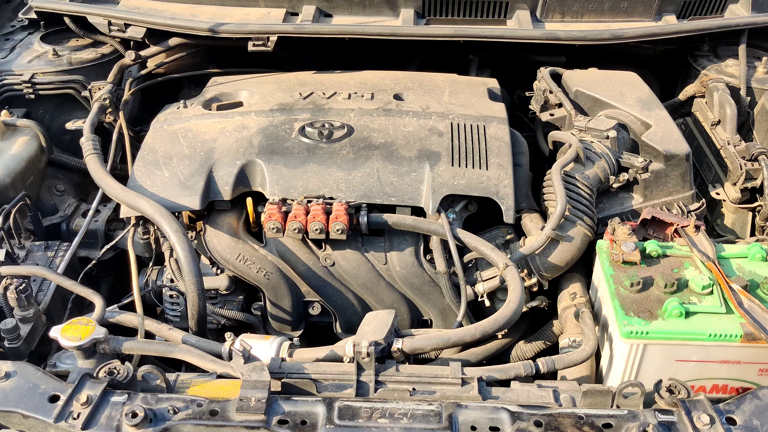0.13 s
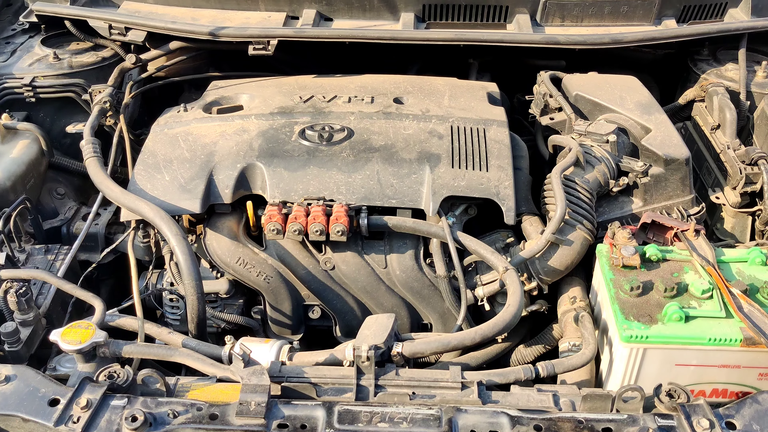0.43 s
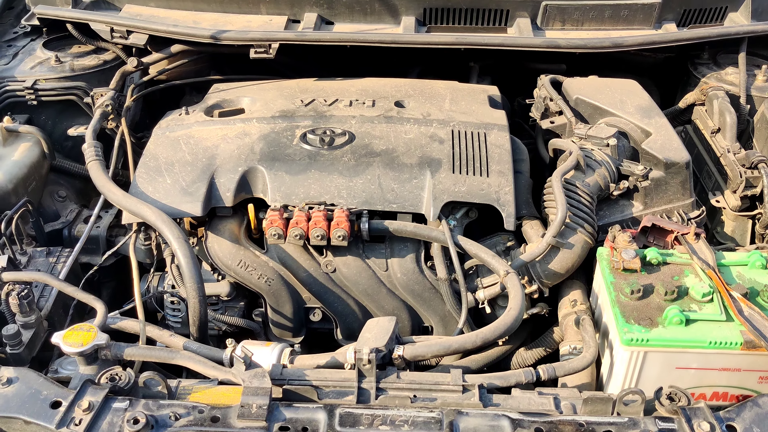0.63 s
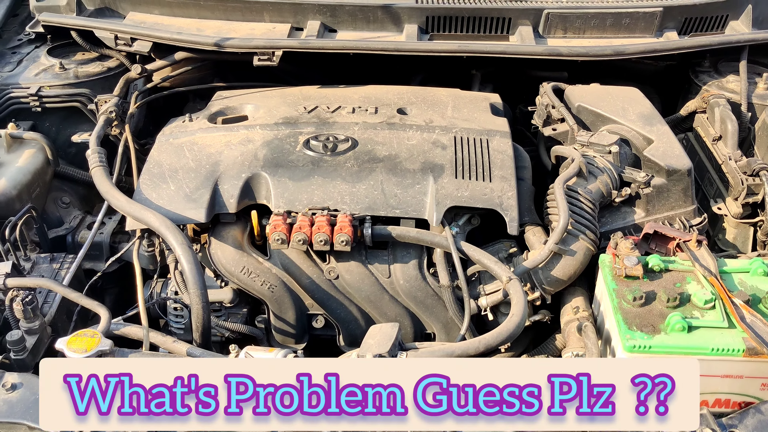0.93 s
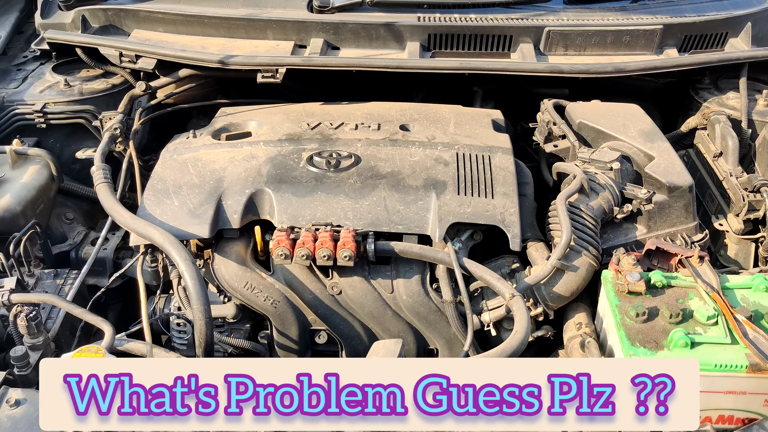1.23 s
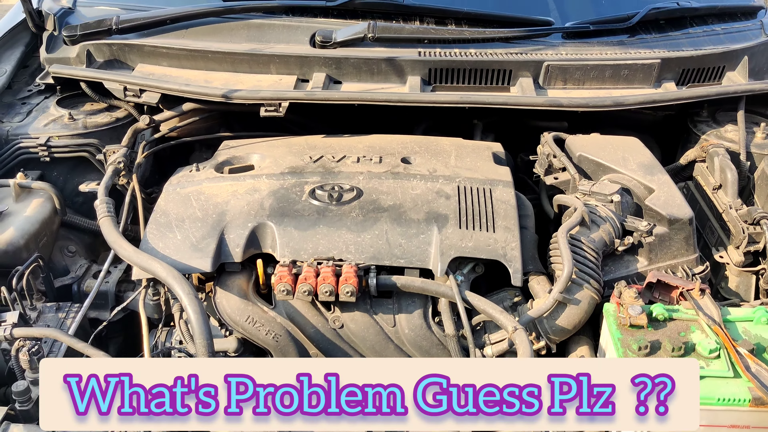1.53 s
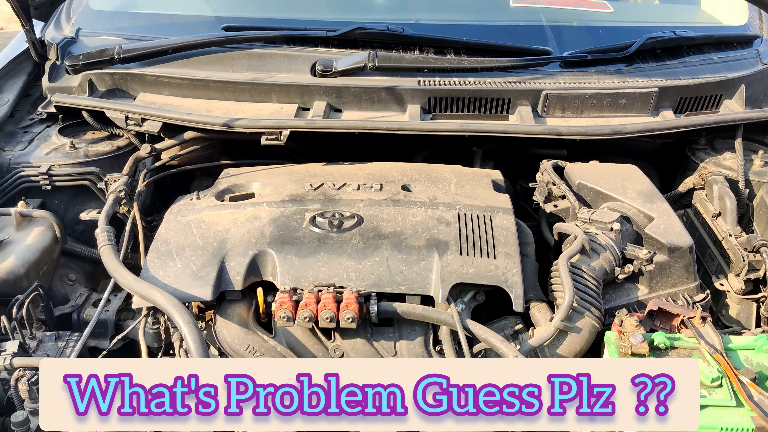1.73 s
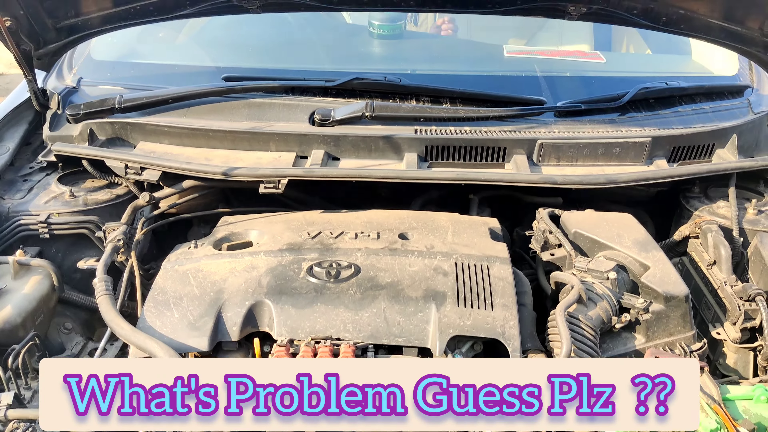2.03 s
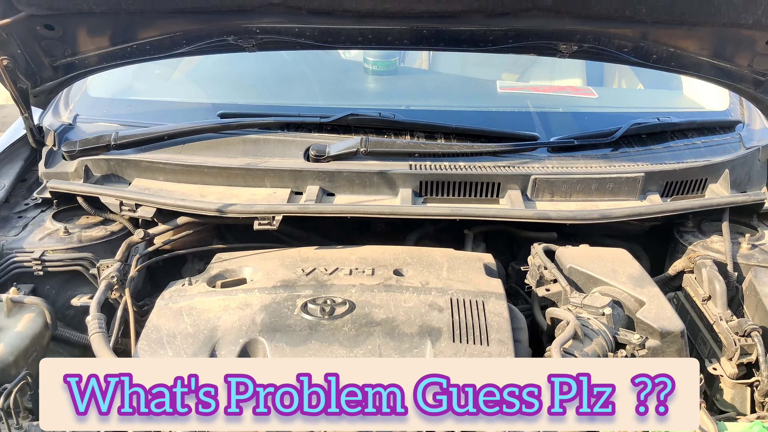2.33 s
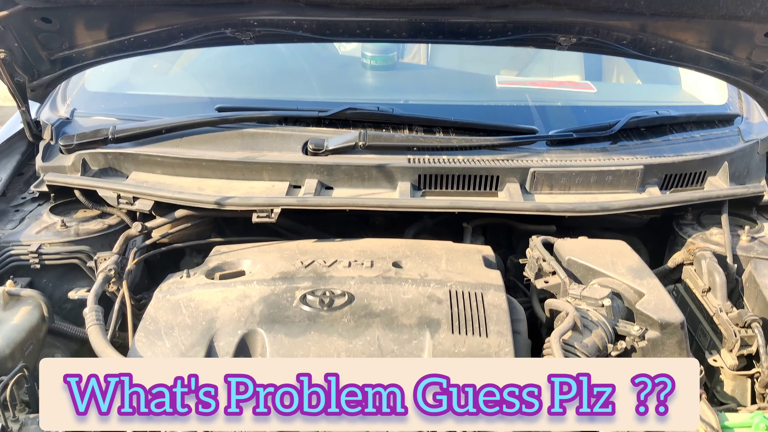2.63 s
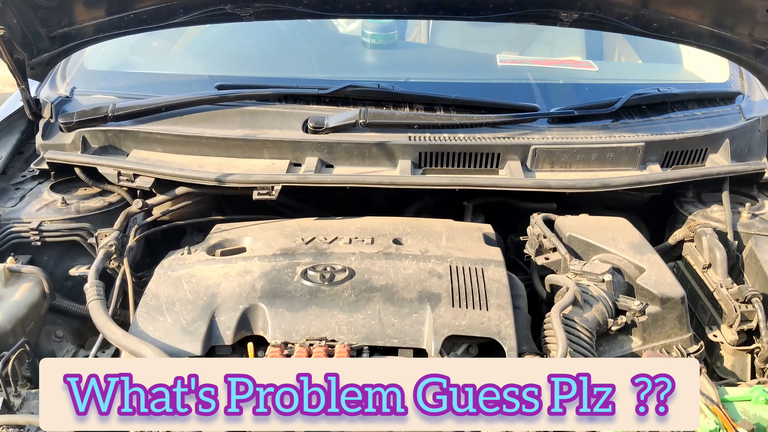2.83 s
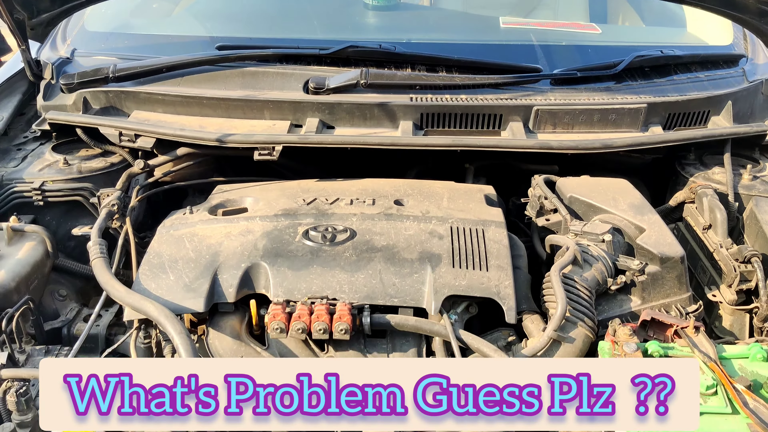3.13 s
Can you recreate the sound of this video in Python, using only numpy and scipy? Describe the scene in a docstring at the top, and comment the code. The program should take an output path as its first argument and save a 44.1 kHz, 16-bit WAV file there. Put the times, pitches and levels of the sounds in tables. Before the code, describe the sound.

A car engine idles steadily with a low rumble and fluttering mechanical hiss.

```python
"""Engine idling under an open bonnet.

Firing pulses thud and flutter the hiss of intake, belts and valve gear; pipes and covers ring.
A slowly rising drone (perhaps a fan or a nearby engine) and a wavering hum fill the bass,
with a few soft throbs and brief chirps. Outdoors, a little wind buffets the ports of a
hand-held stereo microphone. The sound fades in."""
import sys
import numpy as np
from scipy import signal
from scipy.io import wavfile

SR = 44100
rng = np.random.default_rng(int(sys.argv[2]) if len(sys.argv) > 2 else 0)


def wav_record(signal):
    """Record a signal, one row per channel, as 16-bit PCM in the file named by sys.argv[1]."""
    frames = np.transpose(np.atleast_2d(signal))
    bounded = np.clip(frames, -1, 1)
    # unit amplitude maps onto the largest positive 16-bit level
    quanta = np.round(bounded * 32767).astype(np.int16)
    wavfile.write(sys.argv[1], SR, quanta)


N = 145089


def from_db(db):
    """Decibels to gain."""
    return 10 ** (np.asarray(db) / 20)


def unit_rms(x):
    """Scale to rms 1."""
    return x / np.sqrt(np.mean(x ** 2) + 1e-20)


def curves(rows):
    """Columns of a time table, interpolated per sample."""
    times_s, *columns = np.transpose(rows)
    return [np.interp(np.arange(N) / SR, times_s, column) for column in columns]


def at_hz(rows, hz):
    """Spectrum table lookup on a log frequency axis."""
    table_hz, values = np.transpose(rows)
    return np.interp(np.log(hz), np.log(table_hz), values)


def drift(rate_hz):
    """Smooth random wander, rms 1."""
    hop, settle = 40, 2000
    pole = np.exp(-2 * np.pi * rate_hz * hop / SR)
    white = rng.standard_normal(N // hop + settle + 2)
    slow = signal.lfilter([1], [1, -2 * pole, pole * pole], white)[settle:]
    return np.interp(np.arange(N) / hop, np.arange(len(slow)), unit_rms(slow))


# (frequency [Hz], left-right correlation before crossfeed [-1..1])
CORRELATION = [(60, 0.92), (130, 0.91), (290, 0.91), (640, 0.48), (1410, -0.065), (3100, 0.23),
               (6820, -0.2), (15000, 0.29)]
# (frequency [Hz], left minus right [dB])
BALANCE = [(60, 2.5), (110, -1), (200, 1.5), (380, 0), (700, 1), (1290, -1.5), (2380, -4.5), (4400, -0.5),
           (8120, 3), (15000, -0.5)]
CROSSFEED_GAIN, CROSSFEED_LAG_S = 0.27, 0.00017


def stereo(mid, side, hz):
    """Mid/side to left/right; above 900 Hz some left sound reaches the right port later."""
    correlation, balance_db = at_hz(CORRELATION, hz), at_hz(BALANCE, hz)
    pair = np.sqrt(1 + correlation) * mid + np.sqrt(1 - correlation) * side * np.array([[1], [-1]])
    crossfeed = CROSSFEED_GAIN * (hz > 900)
    late_left = np.roll(pair[0], round(CROSSFEED_LAG_S * SR))
    pair[1] = np.sqrt(1 - crossfeed ** 2) * pair[1] + crossfeed * late_left
    return pair * from_db([[balance_db / 2], [-balance_db / 2]]) / np.sqrt(2)


# (time [s], level [dB])
GUSTS = [(.3, -23), (.5, -48), (.85, -26), (1.0, -38), (1.85, -46), (2.1, -24), (2.3, -51), (2.65, -39),
         (3.29, -48.5)]
WIND_BAND_HZ, WIND_LUMP_DB = (14, 58.6), 2.5


def wind():
    """Gusts buffet each port separately: lumpy low noise."""
    level_db, = curves(GUSTS)
    band = signal.butter(2, WIND_BAND_HZ, "band", fs=SR, output="sos")
    rumble = signal.sosfilt(band, rng.standard_normal((2, N)))
    return from_db(level_db - WIND_LUMP_DB * drift(9.4)) * unit_rms(rumble)


# (onset [s], peak [dB], start [Hz], end [Hz], length [s])
CHIRPS = [(1.619, -33, 921, 887, 0.039), (1.813, -34, 714, 598, 0.062), (2.03, -42, 3720, 3396, .03),
          (2.07, -43.5, 3330, 3180, 0.0428), (2.41, -25.5, 250, 205.5, 0.094)]
CHIRP_ROUGH_DB = 2.5


def chirps():
    """Brief rough tones that swell, glide down and fade."""
    t, out = np.arange(N) / SR, 0
    for onset_s, peak_db, start_hz, end_hz, length_s in CHIRPS:
        progress = np.clip((t - onset_s) / length_s, 0, 1)
        envelope = from_db(peak_db + CHIRP_ROUGH_DB * drift(80)) * np.sin(np.pi * progress) ** 2
        cycles = length_s * progress * (start_hz + (end_hz - start_hz) * progress / 2)
        out += envelope * np.sin(2 * np.pi * cycles)
    return out


# (onset [s], peak [dB], pitch [Hz])
THROBS = [(0.254, -16.5, 81), (0.329, -20, 88), (0.439, -23, 92.4), (.605, -14, 115.7), (.61, -29, 245)]
THROB_T60_S = 0.071


def throbs():
    """Soft low knocks: tones that swell and die away."""
    t, out = np.arange(N) / SR, 0
    for onset_s, peak_db, hz in THROBS:
        age = np.maximum(t - onset_s, 0) * np.log(1000) / THROB_T60_S  # in time constants
        envelope = from_db(peak_db) * age * np.exp(1 - age)
        out += envelope * np.sin(2 * np.pi * hz * (t - onset_s))
    return out


# (time [s], level [dB])
HUM_LEVEL = [(.25, -38), (.55, -26), (.7, -33), (1.8, -41), (2.05, -33.5), (2.3, -34), (2.5, -36),
             (3.29, -33)]
HUM_HZ, HUM_WANDER_HZ, HUM_WOBBLE_DB = 80.6, 1.6, 3.7


def hum():
    """A wavering low tone that comes and goes."""
    level_db, = curves(HUM_LEVEL)
    amplitude = np.sqrt(2) * from_db(level_db + HUM_WOBBLE_DB * drift(25))
    hz = HUM_HZ + HUM_WANDER_HZ * drift(5.7)
    return amplitude * np.sin(2 * np.pi * np.cumsum(hz) / SR)


# (time [s], pitch [Hz], harmonic 1 [dB], harmonic 2 [dB], harmonic 3 [dB], harmonic 4 [dB])
DRONE = [(.25, 47.77, -44, -35, -56, -50), (.5, 48.32, -24, -24.5, -55, -41.5),
         (.75, 49.5, -36.5, -27, -48, -39), (1.0, 50.24, -33.5, -31.5, -44, -49),
         (1.25, 50.4, -40, -24, -52, -45.5), (1.45, 51.04, -54, -31, -49, -43.5),
         (1.7, 52.16, -33, -38, -44, -45), (1.95, 52.93, -33, -36, -38, -39),
         (2.25, 53.5, -26, -28, -35.5, -44.5), (2.45, 53.8, -36, -28, -37.5, -34),
         (2.65, 54.18, -41, -23.5, -47, -35.5), (2.95, 54.75, -37, -20.5, -32, -32),
         (3.29, 54.97, -42, -21.5, -43, -34.5)]
# (harmonic [number], level re harmonic 4 [dB])
DRONE_UPPER = [(5, -7.5), (6, -9.5), (8, -10)]
DRONE_WOBBLE_DB, DRONE_WOBBLE_HZ, DRONE_SIDE_DB = 0.5, 6.8, -21.5


def drone():
    """Harmonics of one slowly rising pitch, each wavering slightly in level."""
    hz, *levels_db = curves(DRONE)
    phase = 2 * np.pi * np.cumsum(hz) / SR
    upper = [(k, levels_db[-1] + db) for k, db in DRONE_UPPER]
    tone = 0
    for k, db in list(enumerate(levels_db, 1)) + upper:
        amplitude = np.sqrt(2) * from_db(db - DRONE_WOBBLE_DB * drift(DRONE_WOBBLE_HZ))
        tone += amplitude * np.exp(1j * (k * phase + rng.uniform(0, 2 * np.pi)))
    return tone.real + from_db(DRONE_SIDE_DB) * tone.imag * np.array([[1], [-1]])


# (centre [Hz], width per pass [Hz], start level [dB], gradual swell or fade [dB/s])
RESONANCES = [(188.75, 4.8, -46, 1.5), (436, 21, -51.5, -0.7), (1605.7, 52, -45.5, -0.06),
              (1981, 52, -48.5, -0.7), (1355, 40, -50.5, -0.5), (1173, 27, -54, 0.8),
              (2403, 330, -45.5, -2), (3365, 280, -50.5, -0.5), (5840, 190, -56, 1.5),
              (6120, 380, -50.5, 0)]
TICKS_PER_S, TICK_RE_NOISE_DB = 60, -7


def whistles():
    """Noise and uneven valve ticks ring narrow resonances of pipes and covers."""
    t, out = np.arange(N) / SR, 0
    ticks = unit_rms((rng.random(N) < TICKS_PER_S / SR) * rng.standard_normal(N))
    for hz, width_hz, start_db, db_per_s in RESONANCES:
        radius = np.exp(-np.pi * width_hz / SR)
        b, a = [1, 0, -1], [1, -2 * radius * np.cos(2 * np.pi * hz / SR), radius ** 2]
        drive = rng.standard_normal((2, N)) + from_db(TICK_RE_NOISE_DB) * ticks
        mid, side = unit_rms(signal.lfilter(b, a, signal.lfilter(b, a, drive)))
        out += from_db(start_db + db_per_s * t) * stereo(mid, side, hz)
    return out


# (frequency [Hz], relative spectral density [dB])
BAY_SPECTRUM = [(20, -5), (60, -9), (140, -13.5), (213, -15.5), (290, -19.5), (428, -19), (706, -25),
                (1420, -29.5), (2000, -29), (2500, -32), (3000, -35.5), (3650, -38.5), (4100, -41),
                (5200, -38), (6000, -36.5), (6500, -43), (7000, -55), (7700, -51.5), (8400, -58),
                (9140, -65), (12000, -65.5), (15500, -72)]
# (time [s], level [dB], lift above 3 kHz [dB], further lift at 5-7 kHz [dB])
BAY_LEVEL = [(.5, -27.5, 2, -2.5), (1.05, -28, 2, 0), (1.45, -27, 2, 1.5), (2.1, -25, 0.5, 2.5),
             (2.5, -25.5, 1, 3), (3.29, -25, 0.5, -0.5)]
FLUTTER_DB, FLUTTER_SHARPNESS, OFFBEAT_SHARE = 1.5, 5.4, 0.38
FLICKER_DB, TREBLE_FLICKER_DB = 1.3, 1.07


def bay_noise(phase):
    """Intake, belt and valve noise in quarter octaves; above 500 Hz it swells at each firing."""
    level_db, treble_db, hiss_db = curves(BAY_LEVEL)
    edges_hz = 20 * 2 ** np.arange(0, 9.9, 0.25)
    common_drift, out = drift(5), 0
    white = rng.standard_normal((2, 2, N))  # adjacent bands use independent noise
    beat = np.maximum(np.cos(phase), 0) ** FLUTTER_SHARPNESS
    offbeat = np.maximum(-np.cos(phase), 0) ** FLUTTER_SHARPNESS
    flutter_db = FLUTTER_DB * (beat + OFFBEAT_SHARE * offbeat)
    for k, (low_hz, high_hz) in enumerate(zip(edges_hz, edges_hz[1:])):
        band = signal.butter(3, [low_hz, high_hz], "band", fs=SR, output="sos")
        mid, side = signal.sosfilt(band, white[k % 2])
        hz = np.sqrt(low_hz * high_hz)
        depth_db = TREBLE_FLICKER_DB if hz > 3000 else FLICKER_DB
        flicker_db = depth_db * (0.52 * common_drift + drift(12.5))
        lift_db = (hz > 500) * flutter_db + (hz > 3000) * treble_db + (5000 < hz < 7000) * hiss_db
        out += from_db(at_hz(BAY_SPECTRUM, hz) + flicker_db + lift_db) * stereo(mid, side, hz)
    return from_db(level_db) * unit_rms(out)


# (multiple of firing rate [number], level [dB])
FIRING_ORDERS = [(1, -39.5), (3, -46)]
THUD_WOBBLE_DB = 4.9


def thud(phase):
    """Firing pulses: low multiples of the firing rate, uneven in level."""
    return sum(np.sqrt(2) * from_db(db + THUD_WOBBLE_DB * drift(15)) * np.sin(k * phase)
               for k, db in FIRING_ORDERS)


FIRING_HZ, FIRING_JITTER = 21.88, 0.02


def firing_phase():
    """One cycle per firing at a slightly unsteady idle."""
    hz = FIRING_HZ * (1 + FIRING_JITTER * drift(4.2))
    return 2 * np.pi * np.cumsum(hz) / SR


def scene():
    """All sources at the microphone."""
    phase = firing_phase()
    return drone() + hum() + thud(phase) + bay_noise(phase) + whistles() + chirps() + wind() + throbs()


# (time [s], gain [dB])
FADE_IN = [(.062, -55), (.075, -25.5), (.14, -14.5), (.22, -10.5), (.3, -2.5), (.36, -0.5)]
STOPBAND_HZ = 15900


def record(dry):
    """Fade-in from silence, then a steep low-pass."""
    gain_db, = curves(FADE_IN)
    gate = np.arange(N) / SR > FADE_IN[0][0]
    lowpass = signal.cheby2(18, 70, STOPBAND_HZ, fs=SR, output="sos")
    return signal.sosfilt(lowpass, dry * from_db(gain_db) * gate)


dry = scene()
out = record(dry)
wav_record(out)
```